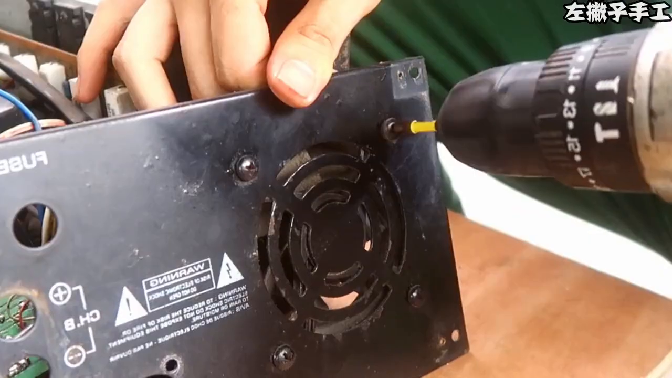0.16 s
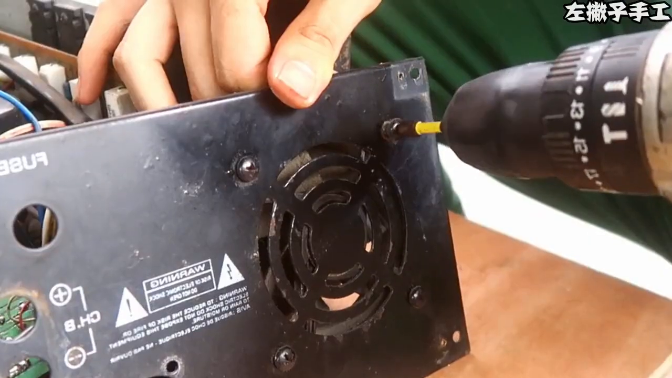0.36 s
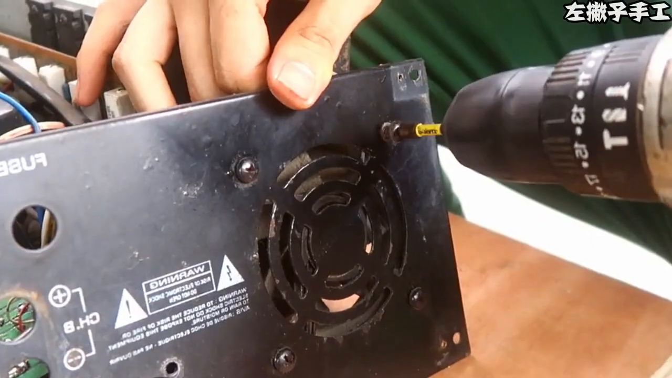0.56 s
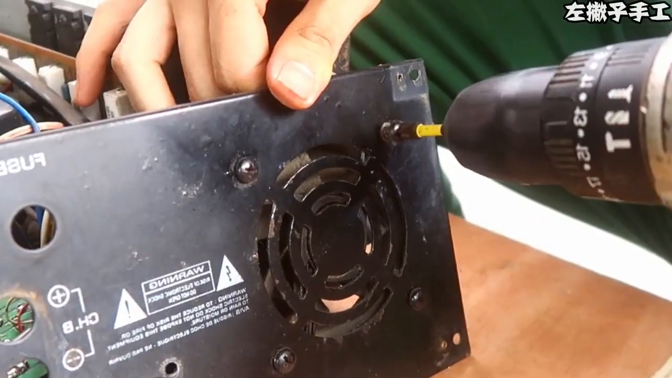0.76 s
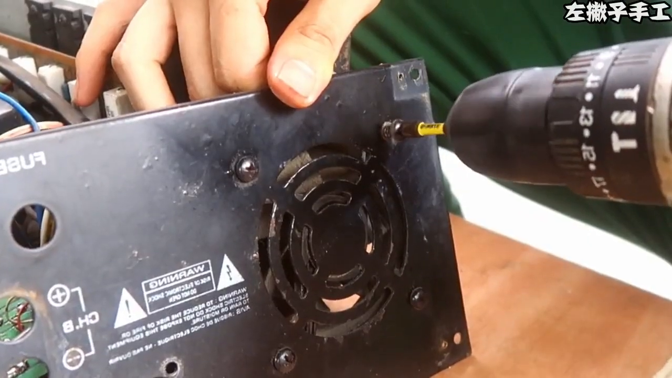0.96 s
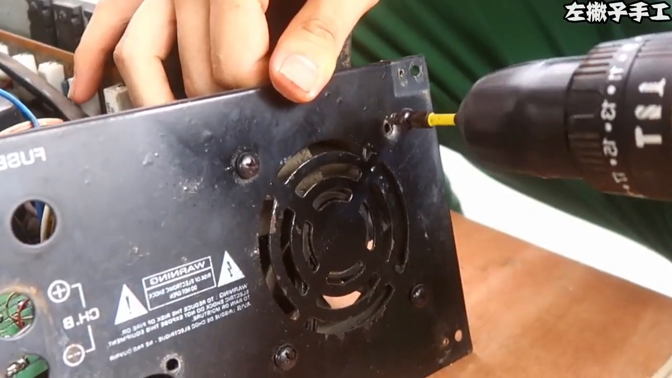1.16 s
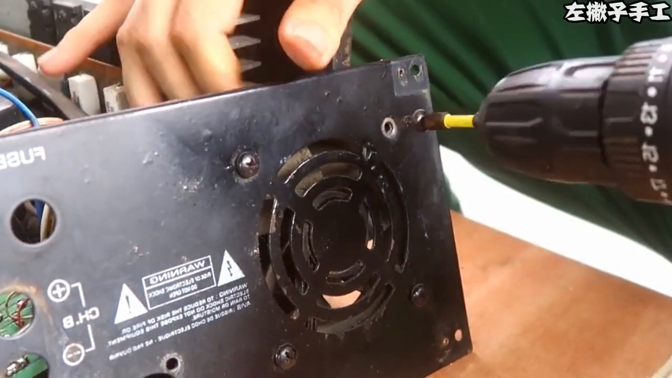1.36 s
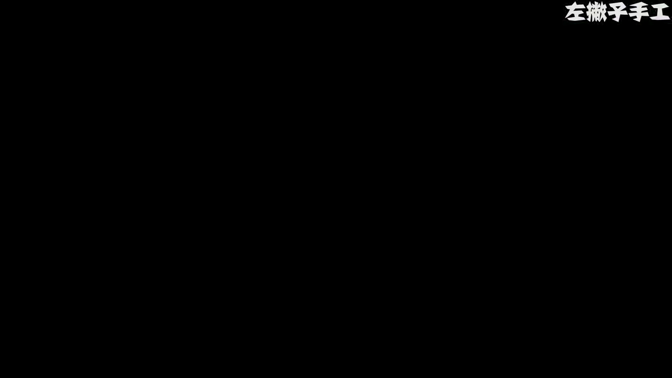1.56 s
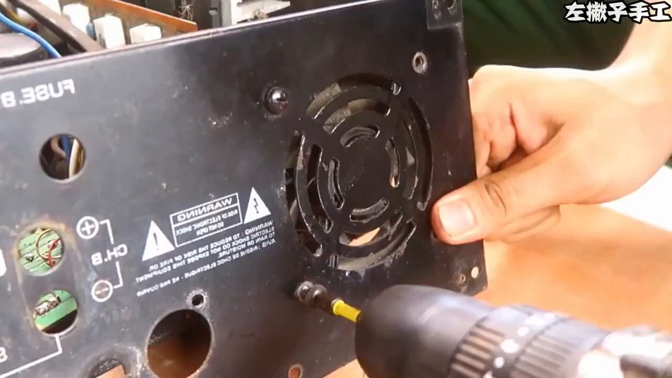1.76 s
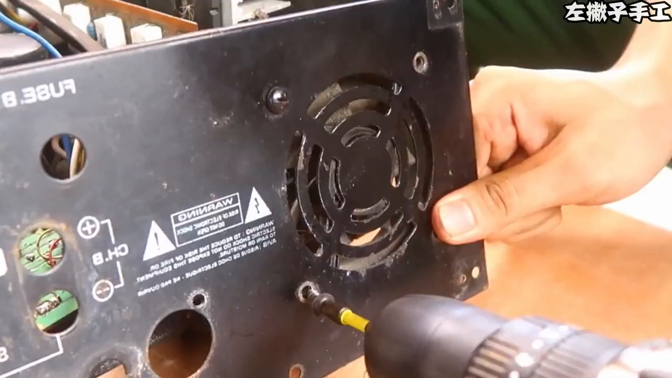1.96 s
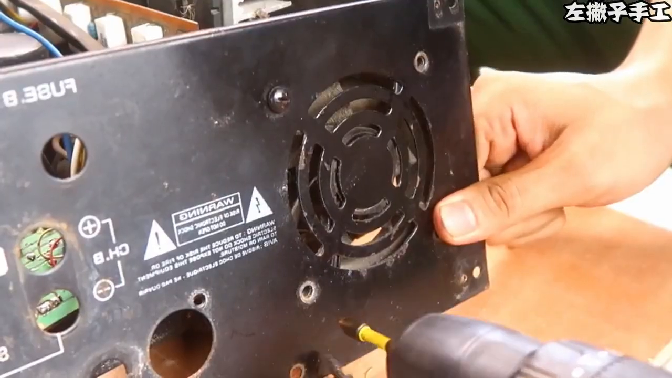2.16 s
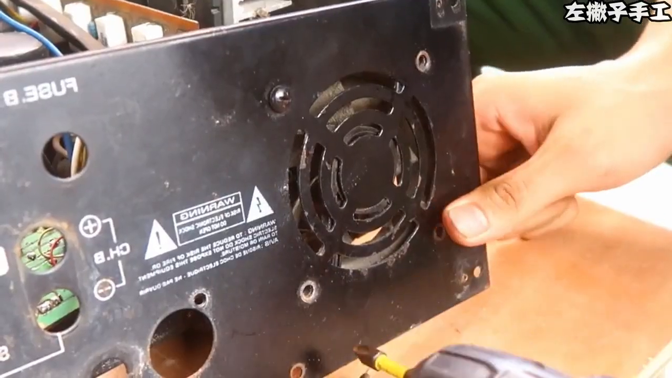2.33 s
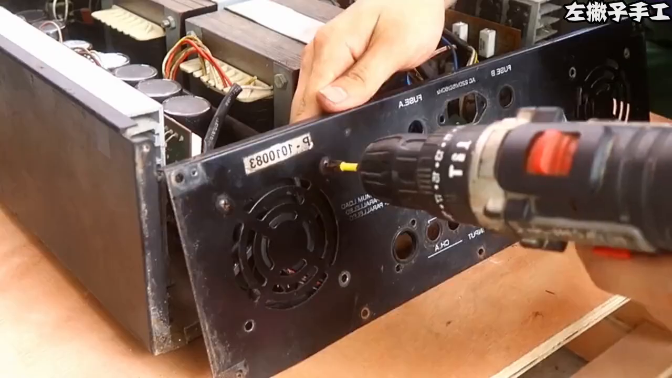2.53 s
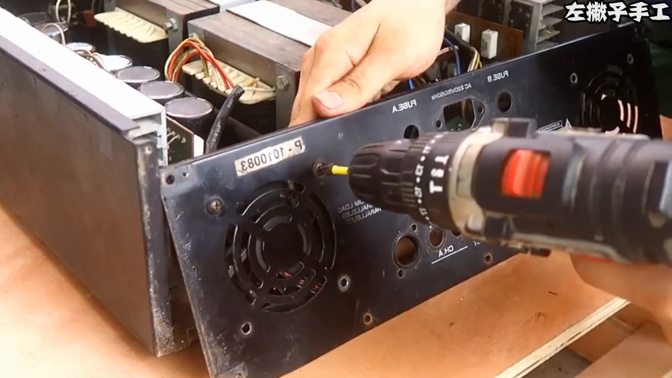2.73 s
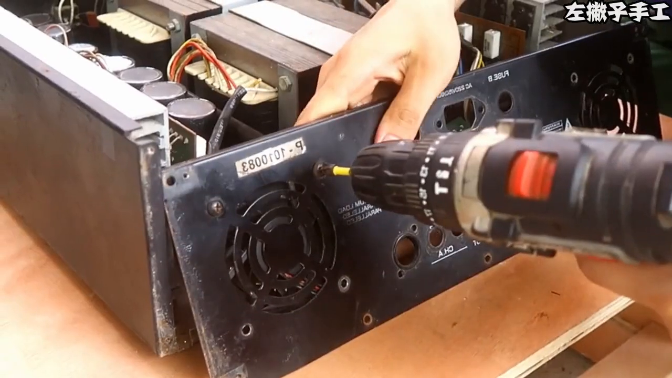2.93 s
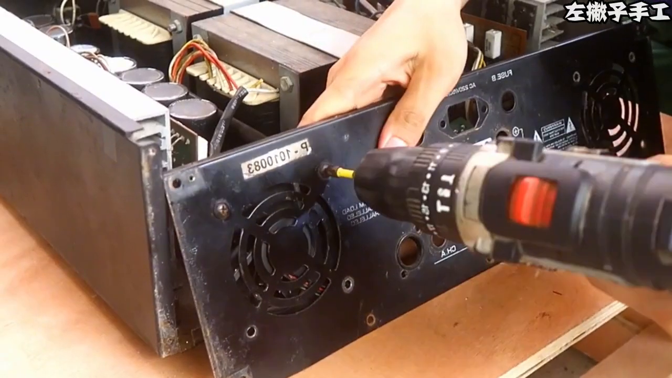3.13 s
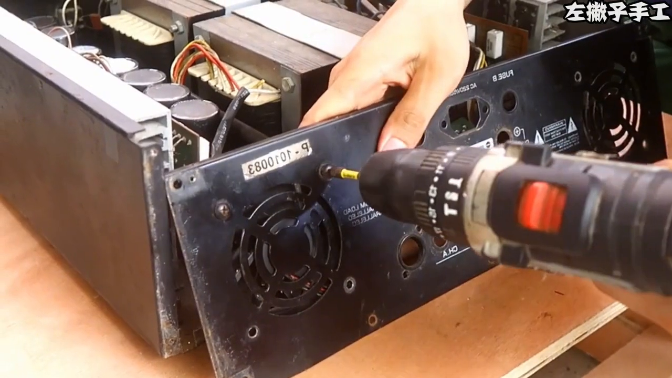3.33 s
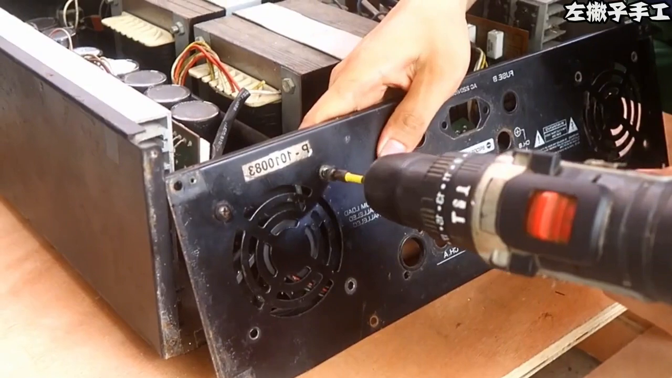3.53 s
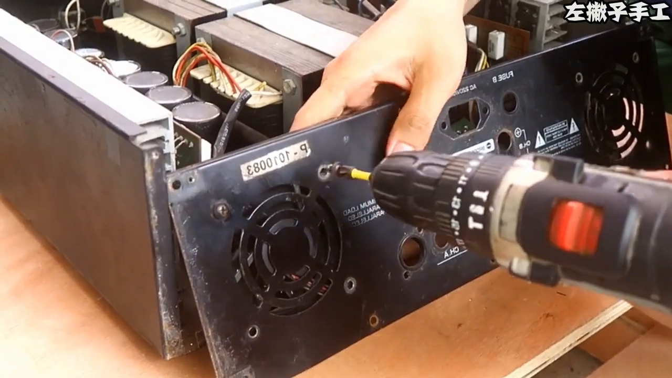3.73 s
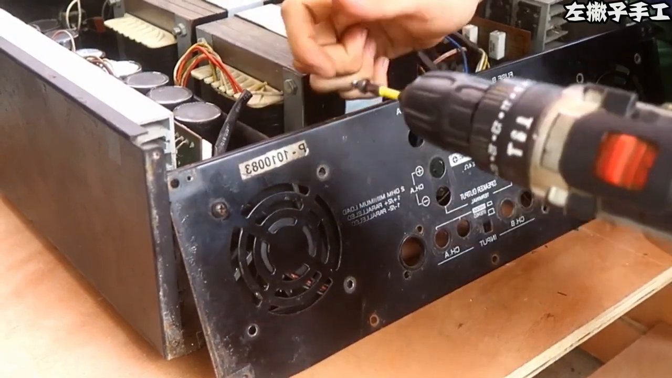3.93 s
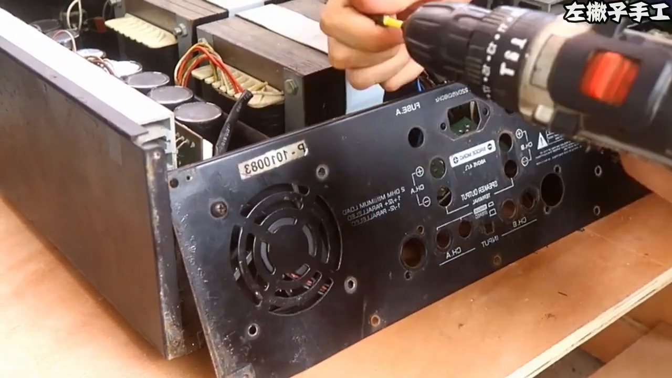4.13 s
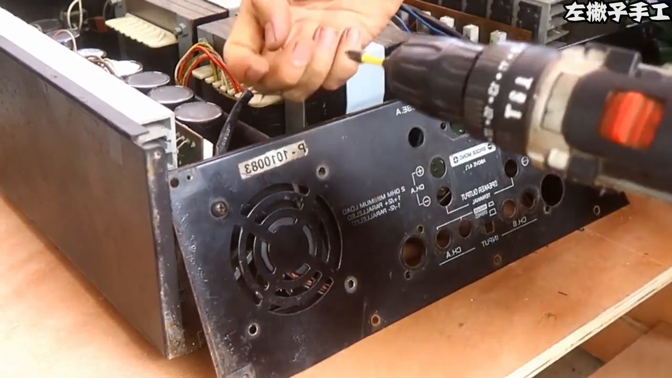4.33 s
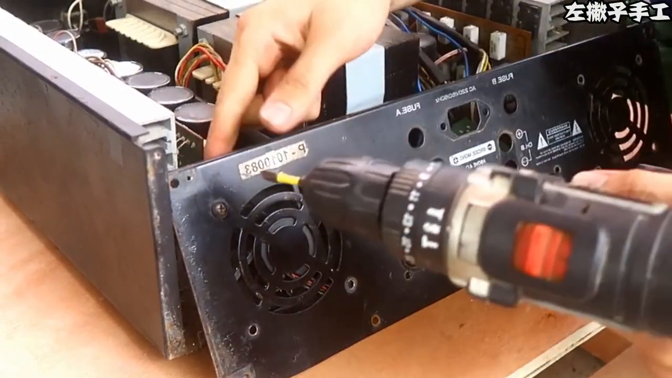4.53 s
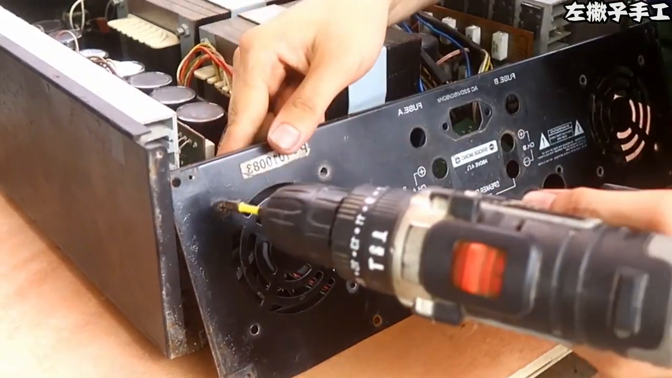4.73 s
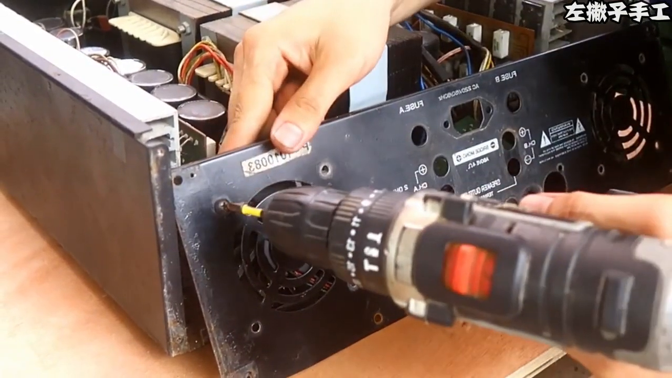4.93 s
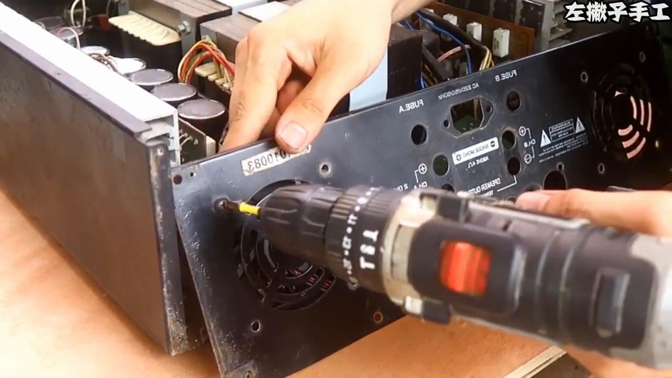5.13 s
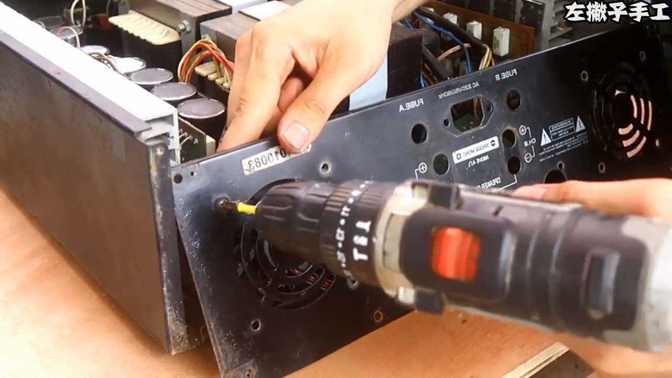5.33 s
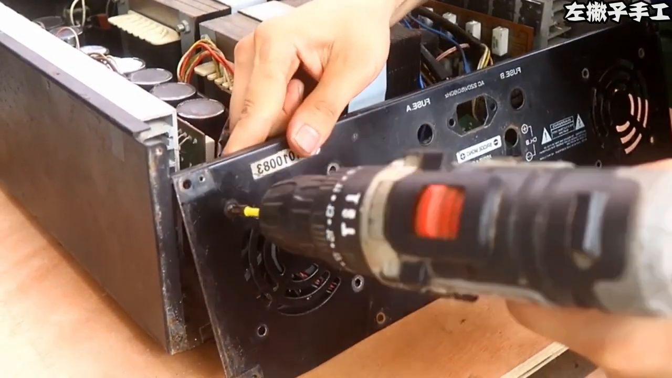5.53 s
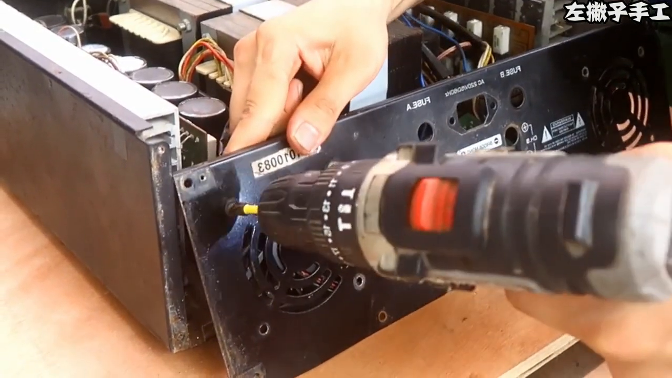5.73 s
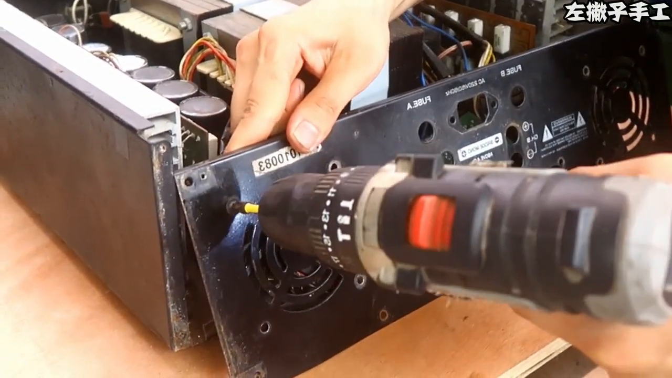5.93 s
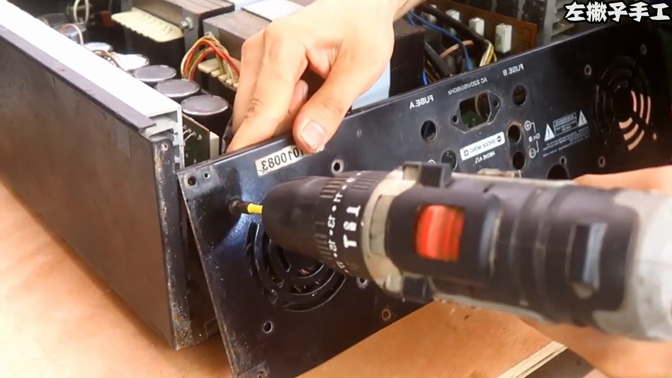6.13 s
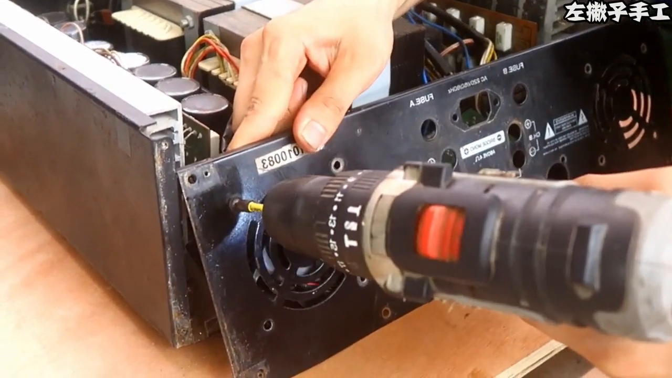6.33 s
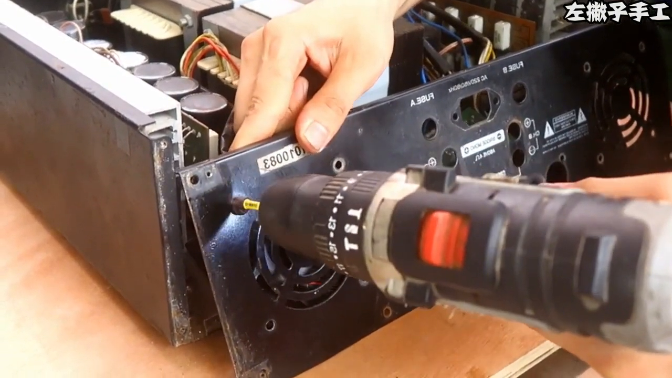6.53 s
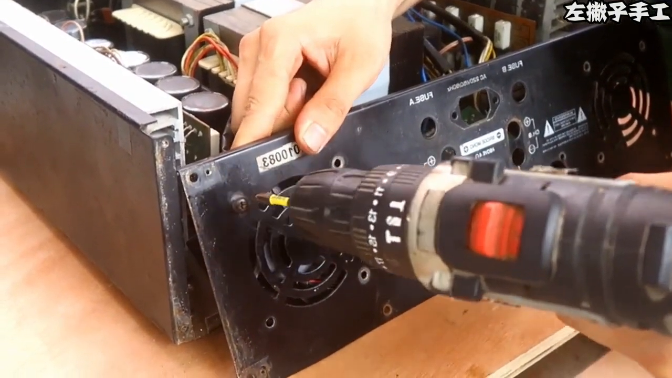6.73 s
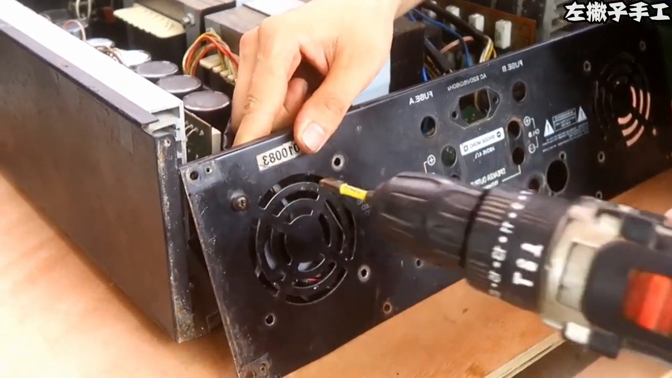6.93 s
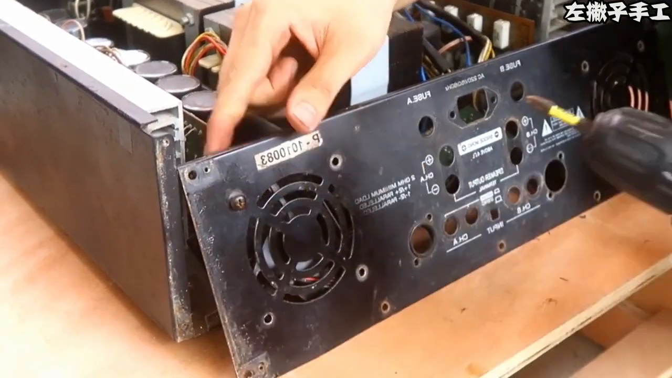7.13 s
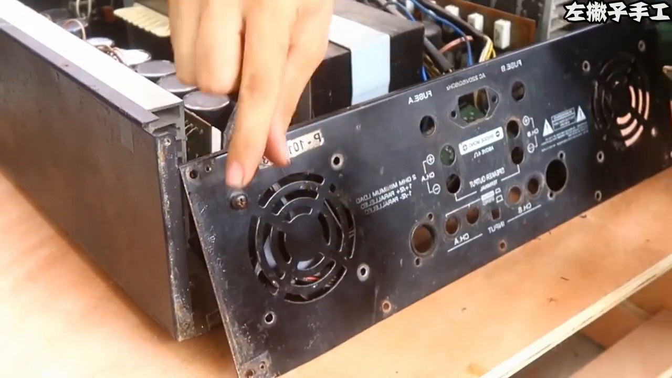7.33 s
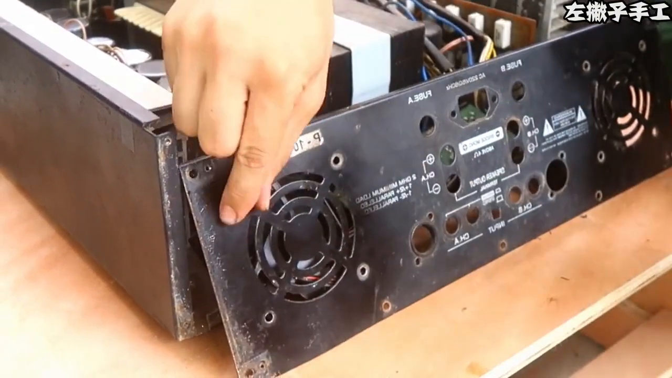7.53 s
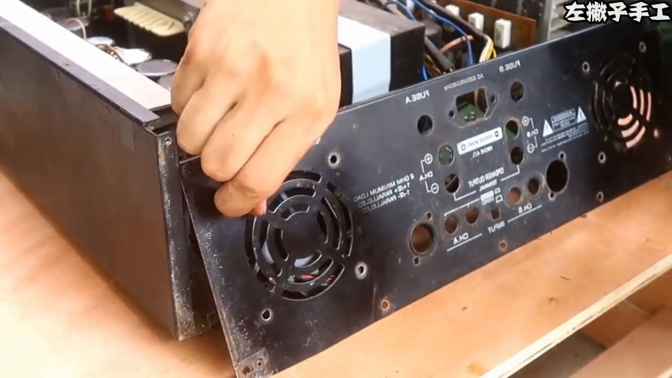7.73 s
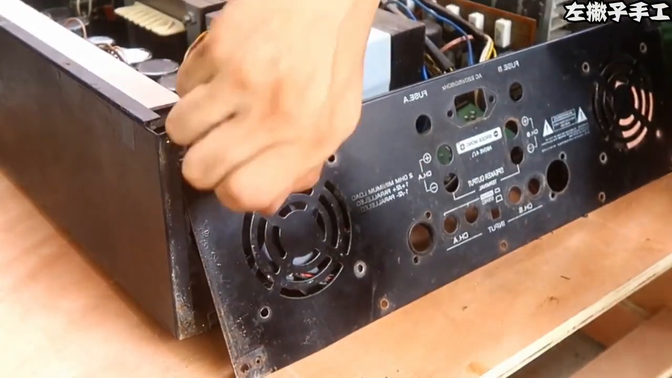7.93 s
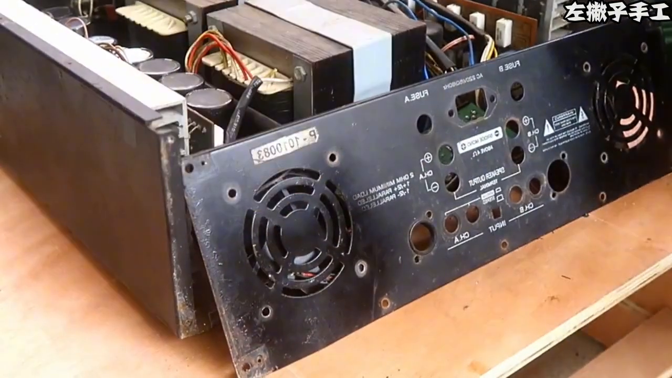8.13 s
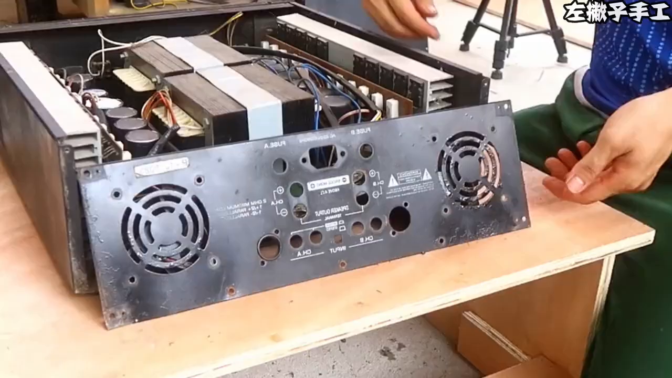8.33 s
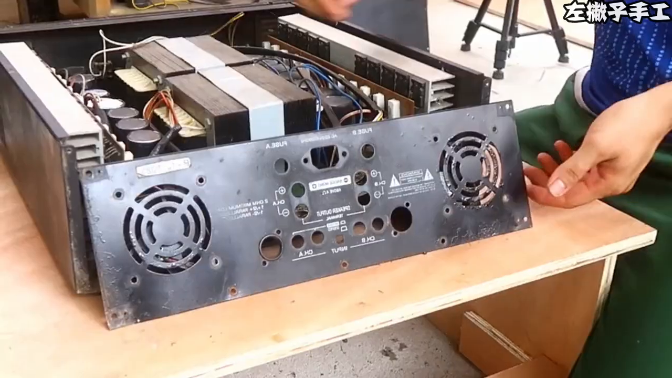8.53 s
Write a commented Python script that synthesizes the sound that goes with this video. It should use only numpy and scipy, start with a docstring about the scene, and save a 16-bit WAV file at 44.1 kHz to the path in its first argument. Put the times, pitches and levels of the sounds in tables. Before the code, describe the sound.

Four bursts of motor hum, gear whine and gritty rattle from a cordless drill loosen screws in a thin steel panel. Between them the panel thuds, ticks and scrapes, and one screw bounces on wood. Late on come soft handling, a bright metallic clink and a hollow tap. Heard close with a short room tail and steady workshop drone; abrupt tiny dropouts return with pops and low thumps at scene changes.

```python
"""A cordless drill backs four screws out of the sheet-steel rear panel of an amplifier on a wooden bench.
Its shaft speed drives motor hum, gear whine, tooth rattle and brush hiss; the speed control whistles.
The loose panel knocks and scrapes, screws drop and roll, and hands rub the case: bursts of noise through
ringing modes and filters. Behind it lie a short room tail and a steady workshop drone with hiss.
Four times the sound drops out for a moment and returns with a pop and a low thump."""
import sys
import numpy as np
from scipy import signal
from scipy.fft import rfft, irfft
from scipy.io import wavfile
from scipy.ndimage import uniform_filter1d

SR = 44100
rng = np.random.default_rng(int(sys.argv[2]) if len(sys.argv) > 2 else 0)


def wrap_up_sound(samples):
    """Save the sound to the file named by the first command line argument, as 16-bit audio."""
    columns = np.atleast_2d(samples).T
    # keep every value between -1 and 1, then stretch to whole-number steps
    tamed = np.clip(columns, -1, 1)
    steps = np.round(tamed * 32767).astype(np.int16)
    wavfile.write(sys.argv[1], SR, steps)


N = 382347
T = np.arange(N) / SR


def undb(db):
    """Decibels to gain."""
    return 10 ** (np.asarray(db) / 20)


def unit(x):
    """Scale to rms 1."""
    return x / np.sqrt(np.mean(x ** 2) + 1e-20)


def noise(size):
    """White noise."""
    return rng.standard_normal(size)


def walk(t, rate):
    """Random drift joined by straight lines, with rate new values a second."""
    return 1.2 * np.interp((t - t[0]) * rate, np.arange(2000), noise(2000))


def ramp(t, start, length):
    """Rises from 0 to 1 over length seconds."""
    return np.clip((t - start) / length, 0, 1)


def gate(t, start, stop, fade):
    """Opens at start over 2.7 ms and closes after stop over fade seconds."""
    return ramp(t, start, 0.0027) * np.clip((stop - t) / fade + 1, 0, 1)


def band(x, lo_hz, hi_hz):
    """Causal band-pass."""
    edges = [lo_hz, min(hi_hz, .45 * SR)]
    return signal.sosfilt(signal.butter(3, edges, "band", fs=SR, output="sos"), x)


def colour(x, points, size=4096):
    """Minimum-phase filter drawn through (Hz, dB) points, made by folding the cepstrum."""
    hz, db = np.transpose(points)
    bins_hz = np.fft.rfftfreq(size, 1 / SR) + 1
    log_gain = np.log(undb(np.interp(np.log(bins_hz), np.log(hz), db)))
    cepstrum = irfft(log_gain)[:size // 2]
    cepstrum[1:] *= 2
    impulse = irfft(np.exp(rfft(cepstrum, size)))
    return signal.fftconvolve(x, impulse)[:len(x)]


def grains(size, rate, spread_db):
    """Random tiny impacts, about rate a second, a few much stronger than the rest."""
    hits = (rng.random(size) < rate / SR) * noise(size)
    return hits * undb(spread_db * np.minimum(rng.exponential(size=size), 4))


def add(out, s, x, lag_ms=0., pan_db=0.):
    """Mix in a sound at s; positive lag delays the left microphone, positive pan favours it."""
    x = np.broadcast_to(x, (2, x.shape[-1]))
    for channel, side in enumerate((1, -1)):
        i = max(int((s + side * lag_ms / 2000) * SR), 0)
        out[channel, i:i + x.shape[1]] += x[channel, :N - i] * undb(side * pan_db / 2)


# The four drill runs. Each row: start, stop, spin-up length in seconds, time the thread lets go in seconds,
# then relative levels in dB of panel rumble, gear rattle, brush hiss and the rattle change while tight.
RUNS = [(0.093, 1.44, 0.0018, 0.93, -50, -58, -56.5, 3.5),
        (1.66, 2.343, 0.0014, 1.87, -52.5, -50.5, -55, -2.5),
        (3.111, 3.718, 0.094, 3.496, -46, -56.5, -62.5, 7),
        (5.822, 6.791, 0.053, 6.38, -47.5, -53.5, -59.5, 0.5)]
# How each run sings and where it stands. Each row: motor lines in relative dB, gear lines at the start in
# relative dB, play in the gears from 0 to 1, lag of the left side in ms, left minus right in dB.
VOICING = [(-62, -51, .9, .4, .3), (-50.5, -62, .17, -.1, -.3), (-63, -48, .9, .5, .3),
           (-61, -50, .9, -.8, -.3)]
# Colour of the running drill, one list a run. Each row: frequency in Hz, relative level in dB.
DRILL_COLOUR = [
    [(76, -30), (130, -3.5), (201, 10.5), (240, 10.5), (300, -2.5), (370, -3.5), (512, -2.5), (690, -4),
     (841, -6), (1250, 0), (1620, -9), (1900, -6), (3150, -18.5), (3520, -10.5), (4740, -32), (8100, -28.5),
     (15000, -43)],
    [(76, -52), (130, -8), (230, -3.5), (330, -12.5), (420, -8), (464, -9), (543, -17), (637, -13),
     (850, -15.5), (1250, -16), (2270, -14.5), (2560, -23), (3730, -12), (3960, -20.5), (9900, -28.5),
     (11000, -37.5), (15000, -63)],
    [(76, -54), (130, -13), (205, -13), (241, -3.5), (294, -5.5), (420, -6), (700, -16), (1050, -11.5),
     (1400, -12.5), (1900, -23.5), (2900, -15), (4040, -21.5), (4930, -23.5), (8100, -18.5), (11100, -21.5),
     (15000, -34)],
    [(76, -53), (130, -8), (193, -7), (235, 1.5), (320, -12), (400, -3), (473, 0), (533, -3), (676, -4.5),
     (1050, -14.5), (1280, -11.5), (1440, -13), (2020, -13), (4040, -14), (5550, -22.5), (10700, -21.5),
     (15000, -38.5)],
]
# Hum of the motor. Each row: multiple of the shaft rate, relative level in dB.
MOTOR_LINES = [(1, 0), (2, -11), (3, -17), (4, -8), (5, -8), (6, -15), (8, -14), (9, -10), (10, -9),
               (11, -14), (16, -19)]
# Whine of the gear train. Each row: multiple of the shaft rate, relative level in dB.
GEAR_LINES = [(3 / 2, -3), (2, -6), (3, 0), (6, -8), (9, -13), (12, -6), (15, -10), (18, -14), (21, -18)]
MESH_DB = 4.5  # gear mesh against the other sources of rattle
THUD_LAG_MS = 1.35  # the wide panel sends its lows to the two microphones out of step


def drill():
    """The shaft sets the pitch of motor and gear lines and paces the tooth impacts and the brushes."""
    out = np.zeros((2, N))
    for (start, stop, *load), voicing, tint in zip(RUNS, VOICING, DRILL_COLOUR):
        motor_db, gear_db, play, lag_ms, pan_db = voicing
        t = T[int(start * SR):int((stop + .06) * SR)]
        rumble, rattle, hiss, hum, whine = efforts(t, shaft(t), start, *load, motor_db, gear_db)
        shaft_hz = shaft(t) * (1 + .005 * play * walk(t, 45))
        turn = 2 * np.pi * np.cumsum(shaft_hz) / SR
        motor = hum * lines(MOTOR_LINES, turn, t, waver_db=2.5, rough=.27 * play)
        gears = whine * lines(GEAR_LINES, turn, t, waver_db=4.5, rough=.38 * play)
        # teeth strike unevenly, nine to a turn
        strikes = np.diff(np.floor(9 * turn / (2 * np.pi)), prepend=0)
        teeth = unit(strikes * noise(len(t)) * undb(2.0 * noise(len(t))))
        mesh = undb(MESH_DB) * through_gears(turn + .09 * play * walk(t, 60), t)
        # the loose panel rattles in tiny random impacts
        loose_grains = unit(grains(len(t), 130, 1.8))
        grit = undb(3 * np.sqrt(play) * walk(t, 55))
        shake = undb(2.8 * walk(t, 36))
        panel, body = [], []
        for _ in range(2):
            # each microphone also hears its own share of the loose play and of the brushes
            loose_noise = .65 * noise(len(t)) * (1 + .6 * np.cos(turn))
            chatter = colour(.5 * teeth + play * loose_grains + mesh + loose_noise, tint)
            brush_noise = noise(len(t)) * (1 + .45 * np.cos(2 * turn))
            brushes = colour(brush_noise + .7 * teeth + mesh, tint)
            panel.append(rumble * shake * unit(band(chatter, 104, 605)))
            rattling = undb(4.5) * rattle * grit * flutter(chatter, t, play)
            hissing = undb(1.5) * hiss * np.sqrt(grit) * unit(band(brushes, 4750, 17000))
            body.append(motor + gears + rattling + hissing)
        running = gate(t, start, stop, 0.0024)
        add(out, start, np.array(body) * running, lag_ms, pan_db)
        add(out, start, np.array(panel) * running, np.sign(lag_ms) * THUD_LAG_MS)
    return out


# Motor speed as the trigger is squeezed and eased, one list a run. Each row: time in seconds, shaft rate in Hz.
SPEED = [
    [(.09, 191), (.2, 222), (.3, 243), (.4, 266), (.55, 284), (.85, 302), (1.0, 275), (1.3, 211),
     (1.45, 109)],
    [(1.66, 407), (1.8, 445.6), (1.9, 465.3), (2.0, 476.2), (2.05, 481.5), (2.1, 469.3), (2.16, 441.4),
     (2.25, 383.8), (2.35, 290)],
    [(3.15, 150), (3.2, 192), (3.27, 240), (3.4, 310), (3.45, 335), (3.5, 378), (3.6, 418), (3.66, 391),
     (3.74, 305)],
    [(5.84, 150), (5.93, 208), (6.0, 235), (6.06, 297), (6.2, 365), (6.3, 390), (6.5, 470), (6.65, 512),
     (6.74, 522), (6.82, 398)],
]


def shaft(t):
    """Motor speed in Hz at the times t, in straight lines between the points."""
    return np.interp(t, *np.concatenate(SPEED).T)


SPIN_UP_DB = -19.5  # level at the first touch of the trigger
LOOSE_DB, LOOSE_S = -25, 0.21  # fall of the panel rumble once the thread lets go, and its length
COAST_RATTLE, COAST_HISS = 1, 1.47  # dB lost per dB of speed lost as the trigger eases
GEAR_EASE_DB = -18  # fall of the gear whine from a tight screw to a free one


def efforts(t, speed, start, rise, free, rumble_db, rattle_db, hiss_db, tight_db, motor_db, gear_db):
    """Gains of rumble, rattle, hiss, motor and gear whine, led by thread tightness and loss of speed."""
    coast_db = 20 * np.log10(speed / np.maximum.accumulate(speed))
    tight = 1 - ramp(t, start, free - start)
    spin_up_db = SPIN_UP_DB * (1 - ramp(t, start, rise))
    return undb(spin_up_db + np.array([rumble_db + LOOSE_DB * ramp(t, free, LOOSE_S) + coast_db,
                                       rattle_db + tight_db * tight + COAST_RATTLE * coast_db,
                                       hiss_db + COAST_HISS * coast_db,
                                       motor_db + 2 * coast_db,
                                       gear_db + GEAR_EASE_DB * (1 - tight) + coast_db]))


def lines(table, turn, t, waver_db, rough):
    """Shaft-rate multiples that swell and fade as the load shifts; play shakes the high phases most."""
    total = 0
    for k, db in table:
        level = undb(db + waver_db * walk(t, 24))
        total = total + level * np.sin(k * turn + rough * np.sqrt(k) * walk(t, 110))
    return unit(total)


MESH_SHIFTS_PER_S = 9


def through_gears(turn, t, size=1520, count=19):
    """The same worn teeth return every count turns, so their rattle glides; load shifts between two flanks."""
    place = turn / (2 * np.pi * count)
    around = np.arange(size) / size
    first, second = (np.interp(place, around, worn_teeth(size), period=1) for _ in range(2))
    shift = walk(t, MESH_SHIFTS_PER_S)
    return unit(np.cos(shift) * first + np.sin(shift) * second)


MESH_RIPPLE_DB = 4.5


def worn_teeth(size, count=75):
    """Roughness around the gear train; wear favours some tooth spacings over others."""
    spots = np.linspace(0, count - 1, size // 2 + 1)
    favour_db = MESH_RIPPLE_DB * np.interp(spots, np.arange(count), noise(count))
    return irfft(rfft(noise(size)) * undb(favour_db))


# Bands of loose gearbox parts. Each row: lower edge in Hz, upper edge in Hz.
RATTLE_BANDS = [(440, 900), (900, 1700), (1700, 2900), (2900, 4670)]
RATTLE_FLICKER_DB = 2.6


def flutter(chatter, t, play):
    """Loose parts of the gearbox rattle in their own bands, each in its own short bursts."""
    return unit(sum(band(chatter, *edges) * undb(RATTLE_FLICKER_DB * play * walk(t, 28))
                    for edges in RATTLE_BANDS))


# Whistle of the chopped motor current. Each row: start in seconds, stop in seconds, pitch in Hz, level in dB,
# then first sideband, second sideband and overtone in dB against the whistle.
CHOPPER = [(.09, .88, 3410, -63, -5, -13, -8), (.9, 1.291, 3785, -72, 0, 1, 2),
           (1.659, 2.05, 3690, -49, -10, -18, -21), (3.29, 3.61, 3690, -72, 5, -8, -15),
           (5.95, 6.74, 3690, -79, 8, -3, -5)]


def whistle():
    """The speed control chops the current; the turning rotor adds sidebands at multiples of the shaft rate."""
    out = np.zeros((2, N))
    for start, stop, hz, db, first_db, second_db, over_db in CHOPPER:
        t = T[int(start * SR):int((stop + .06) * SR)]
        chop = 2 * np.pi * hz * t
        turn = 2 * np.pi * np.cumsum(shaft(t) * (1 + .02 * walk(t, 70))) / SR
        first = undb(first_db) * (np.sin(chop + turn) + .3 * np.sin(chop - turn))
        second = undb(second_db) * (np.sin(chop + 2 * turn) + .5 * np.sin(chop + 3 * turn))
        overtone = np.sin(2 * chop) + 0.58 * np.sin(2 * chop + turn)
        sound = np.sin(chop + 0.36 * walk(t, 42.3)) * undb(0.24 * walk(t, 22.0))
        sound += (first + second) * undb(4.7 * walk(t, 30.8))
        sound += overtone * undb(over_db + 4.0 * walk(t, 28.3))
        add(out, start, np.sqrt(2) * undb(db) * sound * gate(t, start, stop, 0.019), .04)
    return out


# A tight screw groans in its thread. Each row: centre in seconds, half length in seconds, relative level in dB.
GROANS = [(5.961, 0.051, -44), (6.538, 0.025, -60)]
# Pitch of the groan. Each row: multiple of the shaft rate, relative level in dB.
GROAN_LINES = [(3, 4), (6, 1), (9, -18), (12, -18)]


def groans(out):
    """A tight thread sticks and slips in step with the shaft."""
    for s, half_s, db in GROANS:
        t = T[int((s - .15) * SR):int((s + .15) * SR)]
        turn = 2 * np.pi * np.cumsum(shaft(t) * (1 + 0.0073 * walk(t, 199))) / SR
        groan = lines(GROAN_LINES, turn, t, waver_db=4.5, rough=0.31)
        add(out, t[0], groan * undb(db) * np.exp(-((t - s) / half_s) ** 2), -.6)


# A touch of the trigger nudges the bit into the screw head. The row: start in seconds, stop in seconds,
# top shaft rate in Hz, relative level in dB.
NUDGE = (5.52, 5.83, 108, -62)
# Whine of the nudge. Each row: multiple of the shaft rate, relative level in dB.
NUDGE_LINES = [(6, -6), (12, 0), (15, -7), (18, -9)]


def nudge(out):
    """The gears run up to a low speed and down again; level follows speed."""
    start, stop, top_hz, db = NUDGE
    t = T[int(start * SR):int(stop * SR)]
    speed = np.sqrt(np.abs(np.sin(np.pi * ramp(t, start, stop - start))))
    turn = 2 * np.pi * np.cumsum(top_hz * speed) / SR
    add(out, start, lines(NUDGE_LINES, turn, t, waver_db=3, rough=0.15) * undb(db) * speed, .4)


# A hand bumps the panel. Each row: time in seconds, relative level in dB, brightness in dB per band, contact in ms.
BUMPS = [(.54, -59.5, -8, 6), (.862, -57.5, 4, 3.6), (0.936, -66.5, -12.5, 2.9), (2.636, -44.5, 0.5, 1.5),
         (2.68, -45, -6.5, 1.14), (2.985, -51.5, 2, 6.3), (3.296, -50, -3, 4.3), (3.856, -57.5, -7.5, 3.1),
         (4.081, -76.5, -18.5, 4.7), (4.14, -47.5, 0, 1.6), (4.152, -46.5, -1.5, 2.9),
         (4.17, -56.5, -9, 2.7), (4.44, -55.5, 2.5, 9.1), (4.775, -58.5, 2.5, 2.4), (4.964, -64, -0.5, 1.4),
         (5.182, -55.5, 5, 2.6), (5.289, -52.5, 1, 0.98), (5.757, -54, 0, 1.3), (6.507, -45, 3.5, 1.8)]
# Balance of a soft blow: thud, knock, clack and tick bands in dB.
BUMP_DB = [5.5, -1, -7, -22]
# Bit or screw strikes the panel. Each row: time in seconds, then thud, clack and tick of the tip in relative dB,
# contact in ms.
CLACKS = [(0.099, -54, -47, -57, 1.5), (0.499, -42, -48.5, -55, 3.2), (1.427, -70, -55.5, -61, 3.2),
          (3.167, -44.5, -42, -45.5, 1.1), (3.709, -68, -52.5, -54.5, 1.5), (4.227, -53, -59, -66.5, 1.8),
          (4.542, -61, -61, -61.5, 0.6), (5.597, -52, -50, -57.5, 3.1), (5.707, -58, -69, -61.5, 2),
          (5.851, -47, -46, -54, 4.9), (6.2, -41, -45, -47, 2.9), (6.294, -44, -48, -57, 2.4),
          (6.381, -41, -32.5, -52, 1.75), (6.776, -59, -48.5, -52.5, 1.3), (7.221, -60, -57.5, -73, 5.3),
          (7.589, -52, -66, -60, 5.4)]
CLACK_TOP_DB = 1  # upper half of a clack against its lower half


def knocks(out):
    """Soft bumps make the panel thud; hard contact makes it clack and tick."""
    above_knock = np.arange(len(KNOCK_BANDS)) - 1
    for s, db, bright_db, contact_ms in BUMPS:
        knock(out, s, db + np.array(BUMP_DB) + bright_db * above_knock, contact_ms)
    for s, thud_db, clack_db, tick_db, contact_ms in CLACKS:
        knock(out, s, [thud_db, clack_db, clack_db + CLACK_TOP_DB, tick_db], contact_ms)


# Ringing modes of the panel. Each row: frequency in Hz, relative level in dB, 60 dB decay in seconds.
PANEL = [(189, 10.5, 0.084), (240, 17.5, 0.09), (349, 11, 0.064), (432, 10.5, 0.11), (481, 10.5, 0.07),
         (599, 13.5, 0.064), (685, 10, 0.06), (940, 3.5, 0.13), (1155, 9, 0.054), (1293, 22.5, 0.052),
         (1764, -3, 0.067), (2850, -10, 0.021), (2960, -9, 0.24), (4300, 11.5, 0.023)]
# Colour of a panel knock. Each row: frequency in Hz, relative level in dB.
KNOCK_COLOUR = [(90, -8), (210, -0.5), (340, -1), (620, -3.5), (900, -2), (1250, 6), (2000, -6.5),
                (4500, -21.5), (9000, -29.5), (14000, -41)]
# Thud, knock, clack and tick bands. Each row: lower edge in Hz, upper edge in Hz.
KNOCK_BANDS = [(130, 290), (310, 850), (850, 2800), (2800, 13000)]
KNOCK_LAG_MS = .25


def knock(out, s, levels_db, contact_ms):
    """One blow on the panel, with a level for each of its four bands; the upper three vary in lag."""
    blow = strike(PANEL, KNOCK_COLOUR, contact_ms, ring_db=-3, tail_db=-10, tail_s=0.32)
    thud, *upper = (loudest(band(blow, *edges), db) for edges, db in zip(KNOCK_BANDS, levels_db))
    add(out, s - LEAD_S, thud, THUD_LAG_MS)
    add(out, s - LEAD_S, sum(upper), KNOCK_LAG_MS * (1 + rng.standard_normal()))


LEAD_S = .008  # room for the graze ahead of the contact


def strike(modes, tint, contact_ms, ring_db, tail_db, tail_s):
    """A graze, then a rattling contact that rings an object's main modes and a dense wash of weaker ones."""
    t = T[:SR // 2] - LEAD_S
    since = np.maximum(t, 0)
    age = since / (max(contact_ms, .3) / 1000)
    graze = 0.11 * np.exp(-np.abs(t) / 0.0026)
    force = noise(len(t)) * (age * np.exp(-age) + graze)
    ring = 0
    for hz, db, t60 in modes:
        # every blow detunes and rebalances the modes a little
        decay = undb(db - 60 * since / t60 + 2 * noise(1))
        ring = ring + decay * np.sin(2 * np.pi * hz * (1 + 0.01 * noise(1)) * t) * rng.choice([-1, 1])
    swell = 1 - np.exp(-age)
    wash = noise(len(t)) * undb(-60 * since / tail_s) * swell
    contact = colour(unit(force) + undb(tail_db) * unit(wash), tint)
    return unit(contact) + undb(ring_db) * unit(ring * swell)


def loudest(x, db, size=441):
    """Set the level of a sound's loudest stretch, a hundredth of a second unless size says otherwise."""
    return x * undb(db) / np.sqrt(uniform_filter1d(x ** 2, size).max())


# A screw falls and bounces on the bench. Each row: time in seconds, relative level in dB, contact in ms.
BOUNCES = [(2.173, -29.5, 1.84), (2.223, -36.5, 4.3), (2.255, -46, 9.4), (2.319, -40, 1.9),
           (2.486, -54, 1.2)]
# Ringing modes of the bench. Each row: frequency in Hz, relative level in dB, 60 dB decay in seconds.
BENCH = [(221, -1.5, 0.66), (612, 9, 0.15), (1004, 1, 0.091), (1190, -4, 0.2), (1247, 10, 0.08),
         (1330, 16, 0.088), (1700, -2, 0.069), (1850, 13, 0.1), (2510, 5, 0.1), (2960, 7, 0.035),
         (3560, -13, 0.076), (4340, -8, 0.15)]
# Colour of the bench contact. Each row: frequency in Hz, relative level in dB.
BENCH_COLOUR = [(88, -50), (150, -9.5), (346, -18), (556, -11), (800, -7), (1000, -4.5), (1410, -3),
                (1870, -5), (2100, -10), (3010, -4.5), (5320, -25), (9760, -31), (10500, -36), (11400, -27),
                (14000, -105)]


def bounces(out):
    """Each landing of a loose screw rings the wooden bench."""
    for s, db, contact_ms in BOUNCES:
        hit = strike(BENCH, BENCH_COLOUR, contact_ms, ring_db=-8.5, tail_db=-15, tail_s=0.29)
        add(out, s - LEAD_S, loudest(hit, db), -.05)


# The fallen screw rolls. The row: start, full level and stop in seconds, relative level in dB, swell in dB.
ROLL = (2.33, 2.435, 2.489, -54, 16)
# The roll sounds strongest in one narrow band. Each row: frequency in Hz, relative level in dB.
ROLL_COLOUR = [(880, -50), (1500, -14), (1870, -10), (2250, -19), (2800, -7), (3200, 1), (3560, 3.5),
               (3920, -16), (4400, -16), (5070, -34), (7000, -32), (9100, -62), (15400, -90)]


def roll(out):
    """A rolling screw is coloured noise and tiny impacts that grow louder, then stop."""
    start, full, stop, db, swell_db = ROLL
    rolling = unit(colour(noise(N) + .6 * unit(grains(N, 900, 1.8)), ROLL_COLOUR))
    level = undb(db - swell_db * (1 - ramp(T, start, full - start)))
    add(out, 0, rolling * level * gate(T, start, stop, .004))


# A screw is tossed among metal parts. Each row: time in seconds, relative level in dB, contact in ms.
CLINKS = [(7.842, -32.5, 4.6), (7.855, -48, 4.8)]
# Ringing modes of the metal parts. Each row: frequency in Hz, relative level in dB, 60 dB decay in seconds.
METAL = [(639, -8, 0.16), (1480, -9, 0.2), (2530, -5, 0.16), (3000, -15, 0.14), (3510, -10, 0.31),
         (4540, -18, 0.28), (4560, -9, 0.28), (4800, -13, 0.15), (6400, -20, .18), (7830, -1, 0.16),
         (8540, 6, 0.11), (9114, -15, 0.11), (11600, 19.5, 0.068), (13400, -10, 0.13)]
# Colour of the metal contact. Each row: frequency in Hz, relative level in dB.
METAL_COLOUR = [(120, -35), (200, -7), (446, -13.5), (630, -6.5), (974, -24), (1450, -13), (1840, -18),
                (2420, -13), (3240, -18), (3550, -11.5), (3960, -8.5), (6020, -7.5), (7090, -16.5),
                (11400, -11.5), (15500, -23)]


def clinks(out):
    """A tossed screw rings the high modes of the metal parts it meets."""
    for s, db, contact_ms in CLINKS:
        # each microphone hears the screw itself and its own share of the parts around it
        shared, *own = (strike(METAL, METAL_COLOUR, contact_ms, ring_db=-4.5, tail_db=-4, tail_s=0.22)
                        for _ in range(3))
        add(out, s - LEAD_S, np.array([loudest(shared + 0.71 * part, db) for part in own]), .3, -1.5)


# A hollow tap on the case. Each row: time in seconds, relative level in dB, contact in ms.
TAPS = [(8.012, -41.5, 2.7)]
# Ringing modes of the hollow case. Each row: frequency in Hz, relative level in dB, 60 dB decay in seconds.
HOLLOW = [(360, -18.5, 0.29), (463, -17, 0.3), (830, 11.5, 0.033), (1317, -6, 0.055), (2060, -25, 0.2),
          (4506, -44, 0.44)]
# Colour of the tap. Each row: frequency in Hz, relative level in dB.
HOLLOW_COLOUR = [(120, -46), (200, -44), (471, -10.5), (656, -13.5), (823, -9), (997, -13), (2110, -20.5),
                 (2560, -24), (4640, -23), (13000, -48)]


def taps(out):
    """A tap on the case rings more than it clicks."""
    for s, db, contact_ms in TAPS:
        hit = strike(HOLLOW, HOLLOW_COLOUR, contact_ms, ring_db=4.5, tail_db=-1.0, tail_s=1.0)
        add(out, s - LEAD_S, loudest(hit, db), .4, -1.5)


# The loose panel scrapes on bench and case, ringing where it touches; the first row is a faint squeak # of a
# screw. Each row: start in seconds, length in seconds, relative level in dB, brightness in dB per octave, #
# ring in Hz, ring against the scrape in dB.
SCRAPES = [(1.488, 0.055, -67, 6, 2260, 11), (2.607, 0.027, -45.5, 6, 447, 8),
           (2.634, 0.041, -46, 1, 444, -1), (2.716, 0.016, -58.5, 2.5, 480, -3),
           (2.828, 0.0095, -57, 3.5, 1170, 3), (2.842, .015, -60.5, -0.5, 324, -2),
           (2.896, 0.025, -62, 4.5, 250, 4), (4.141, 0.038, -49, 4, 560, 9),
           (4.206, .04, -56, 1.5, 720, -4), (4.399, 0.054, -54.5, 1, 270, -6),
           (4.587, 0.012, -59, 2, 480, 2), (4.652, 0.054, -62, 3, 480, 10),
           (4.775, 0.0076, -60, 3, 1230, -4), (4.79, 0.046, -60.5, 3, 300, -5),
           (5.18, 0.045, -55, 2, 860, -1), (5.288, 0.0073, -49.5, -0.5, 460, 1),
           (5.501, 0.066, -53, 1.5, 212, 7), (5.628, 0.045, -48.5, 0.5, 516, -6),
           (5.752, 0.01, -50.5, 2, 487, 3), (7.222, 0.023, -59, 6.5, 1210, 4),
           (7.257, 0.052, -57.5, 1, 555, -10), (7.37, 0.021, -61, 1, 600, -10),
           (7.449, 0.013, -67, 0, 410, 9), (7.707, 0.034, -60.5, 2, 990, -3),
           (8.017, .032, -56, 5.5, 830, -1), (8.188, 0.089, -59.5, 4.5, 690, -13)]
# Colour of a scrape before its brightness tilt. Each row: frequency in Hz, relative level in dB.
SCRAPE_COLOUR = [(100, -7.5), (190, 6), (300, 7.5), (450, 7.5), (700, -2.5), (950, -9), (1350, -15.5),
                 (2000, -15.5), (3000, -25), (5000, -37), (13000, -63)]
SCRAPE_RELEASE_S, SCRAPE_SLIPS_PER_S, SCRAPE_LAG_MS, SCRAPE_RING_Q = 0.012, 760, 0.61, 3.5


def scrapes(out):
    """The loose panel drags in quick, uneven slips that ring it; an edge sounds brighter than the flat. A screw
    squeaks once in the same way."""
    t = T[:SR // 2]
    for start, length, db, tilt_db, ring_hz, ring_db in SCRAPES:
        tint = [(hz, level + tilt_db * np.log2(hz / 500)) for hz, level in SCRAPE_COLOUR]
        slips = grains(len(t), SCRAPE_SLIPS_PER_S, 2.0) + 0.12 * noise(len(t))
        release = np.exp(-np.maximum(t - length, 0) / SCRAPE_RELEASE_S)
        pressure = ramp(t, 0, 0.0032) * release * undb(2 * walk(t, 78))
        rub = slips * pressure
        peak = signal.iirpeak(ring_hz, SCRAPE_RING_Q, fs=SR)
        ring = signal.lfilter(*peak, signal.lfilter(*peak, rub))
        drag = unit(colour(rub, tint)) + undb(ring_db) * unit(ring)
        add(out, start, loudest(drag, db, size=int(length * SR)), SCRAPE_LAG_MS)


# A hand slides on the case. Each row: start in seconds, length in seconds, relative level in dB.
HANDS = [(2.832, 0.48, -62), (3.13, 0.068, -55), (3.738, 0.11, -57), (4.243, 0.05, -58), (4.422, 0.17, -66),
         (4.828, 0.052, -62), (5.04, 0.028, -74), (5.24, 0.048, -57), (5.536, 0.3, -53.5),
         (5.793, 0.057, -50.5), (6.8, 0.025, -60), (7.745, 0.13, -64.5), (8.077, 0.032, -71),
         (8.192, 0.25, -59.5), (8.41, 0.28, -63.5)]
# Colour of the rub. Each row: frequency in Hz, relative level in dB.
HANDS_COLOUR = [(100, -17.5), (220, 8), (350, 3), (550, -1.5), (900, -6.5), (1400, -5), (2500, -17),
                (4500, -26.5), (9000, -32.5), (13000, -46)]
SLIDE_ATTACK_S, SLIDE_RELEASE_S, SLIDE_SAG_DB_PER_S = 0.0082, 0.036, -10
FIDGET_DB, FIDGET_FROM_S = -73.5, 1.9  # fingers keep shifting on the case between the slides


def hands(out):
    """Skin and steel rub in small, uneven slips; each slide starts quickly, sags and dies away."""
    pressure = undb(FIDGET_DB) * (T > FIDGET_FROM_S)
    for start, length, db in HANDS:
        held = np.clip(T - start, 0, length)
        release = np.exp(-np.maximum(T - start - length, 0) / SLIDE_RELEASE_S)
        slide = undb(db + SLIDE_SAG_DB_PER_S * held) * ramp(T, start, SLIDE_ATTACK_S) * release
        pressure = pressure + slide
    slips = unit(colour(grains(N, 900, 4.5), HANDS_COLOUR))
    unevenness_db = 2 * walk(T, 25)
    add(out, 0, slips * pressure * undb(unevenness_db - 5.5), .6)


ROOM_T60_S, ROOM_DB, ROOM_DAMP_HZ = 0.31, -2.5, 9540


def room(dry):
    """Bench and walls send a different short, dull tail to each microphone."""
    t = T[:SR // 2]
    decay = undb(-60 * t / ROOM_T60_S) + 3.2 * np.exp(-t / 0.0045)
    wet = []
    for channel in dry:
        tail = band(noise(len(t)), 200, ROOM_DAMP_HZ) * decay * (t > .002)
        wet.append(signal.fftconvolve(channel, tail / np.sqrt(np.sum(tail ** 2)))[:N])
    return undb(ROOM_DB) * np.array(wet)


def room_between_dropouts(dry):
    """A fresh room tail for each stretch of sound, cut where the next dropout begins."""
    stretch = np.searchsorted([row[0] for row in DROPOUTS], T)
    return sum(room(dry * (stretch == k)) * (stretch == k) for k in np.unique(stretch))


# Colour of the workshop background. Each row: frequency in Hz, relative level in dB.
SHOP_COLOUR = [(18, -10), (32, -12), (58, 5.5), (80, -4), (154, -10.5), (216, -11), (296, -7), (394, -14.5),
               (716, -18.5), (859, -18.5), (1170, -20.5), (1300, -22), (9390, -42.5), (11600, -44),
               (13200, -57), (15000, -73)]


def workshop():
    """Steady background: a low drone shared by both sides, and hiss of opposite sign left and right."""
    mid = colour(noise(N), SHOP_COLOUR)
    side = band(colour(noise(N), SHOP_COLOUR), 105, 16000)
    level = undb(-56 - 3.5 + .5 * walk(T, 3.7))
    return level * (mid + 0.92 * np.array([side, -side])) / np.std(mid)


def scene():
    """Handling is lifted in the direct sound, the drill eased in the room; whistle and background stay dry."""
    tool = drill()
    handling = np.zeros((2, N))
    for layer in (groans, nudge, knocks, bounces, roll, clinks, taps, scrapes, hands):
        layer(handling)
    wet = room_between_dropouts(handling + undb(-3) * tool)
    return tool + whistle() + undb(3.0) * handling + wet + workshop()


# The sound drops out, then returns with a pop and a low thump. Each row: gap start in seconds, gap end in
# seconds, pop in dB, thump in dB, time from the gap end to the thump's peak in seconds.
DROPOUTS = [(0.069, 0.092, -85, -33, 0.034), (1.617, 1.66, -32.5, -29.5, 0.016),
            (2.492, 2.497, -38.5, -33, 0.025), (8.371, 8.38, -31.5, -29, 0.031)]
TOP_HZ = 15200


def record(dry):
    """The sound is nearly muted in each gap, then pops and thumps as it returns; the top is cut."""
    out = dry
    for start, stop, pop_db, thump_db, length in DROPOUTS:
        since = np.maximum(T - stop, 0)
        pop = undb(pop_db) * since / 0.0012 * np.exp(1 - since / 0.0011)
        age = since / length
        push = age ** 2 * np.exp(2 - 2 * age)
        rebound = 0.15 * age / 4 * np.exp(1 - age / 4)
        thump = -undb(thump_db) * (push - rebound)
        out = out * (1 - 0.967 * gate(T, start, stop, 0.0013)) + pop + thump
    return signal.sosfilt(signal.ellip(8, .2, 70, TOP_HZ, fs=SR, output="sos"), out)


dry = scene()
out = record(dry)
wrap_up_sound(out)
```